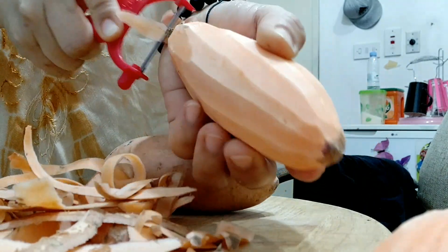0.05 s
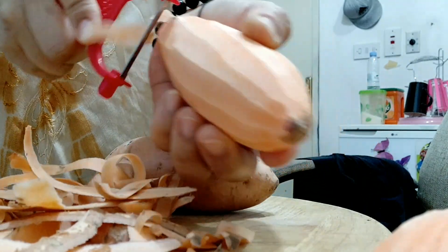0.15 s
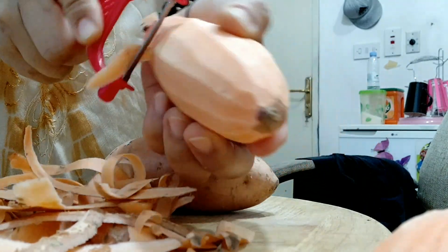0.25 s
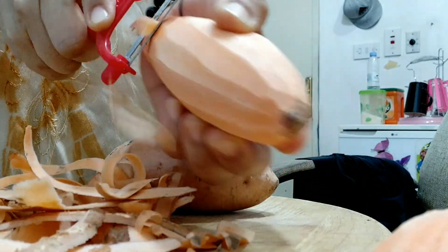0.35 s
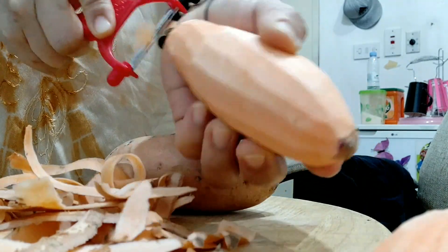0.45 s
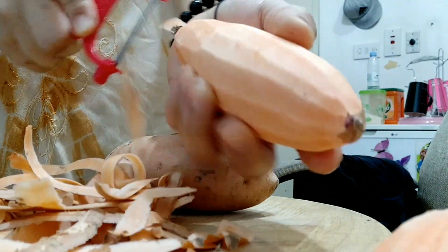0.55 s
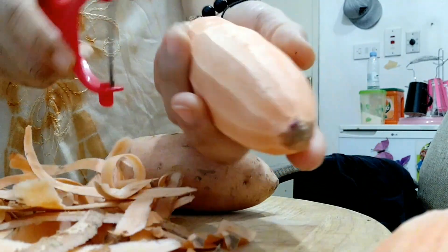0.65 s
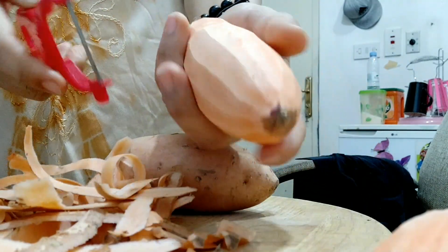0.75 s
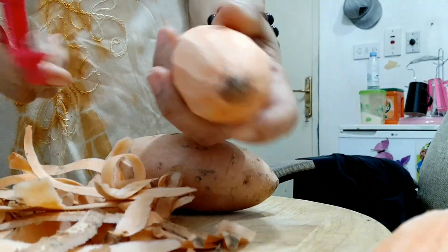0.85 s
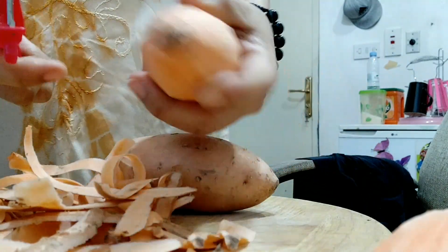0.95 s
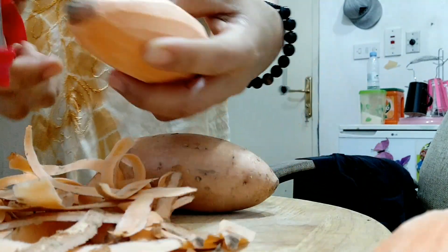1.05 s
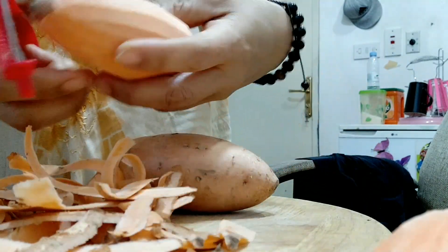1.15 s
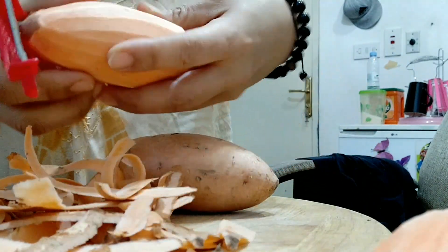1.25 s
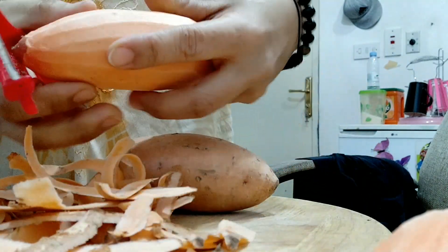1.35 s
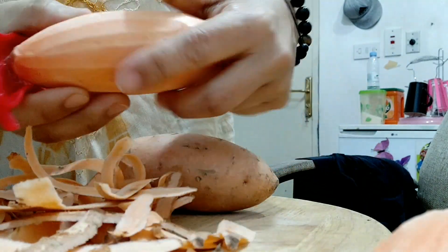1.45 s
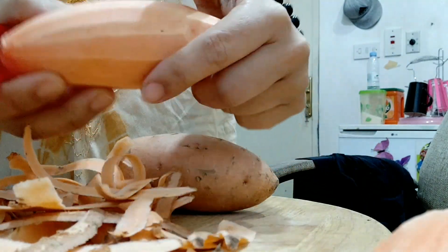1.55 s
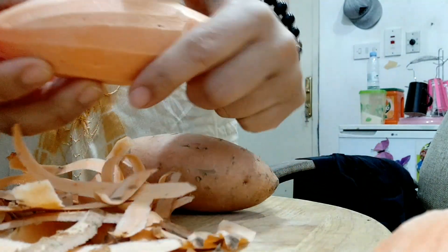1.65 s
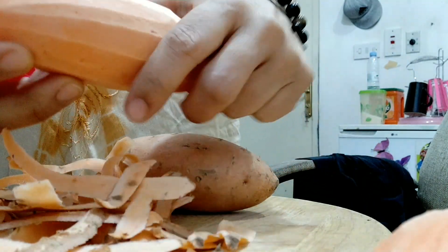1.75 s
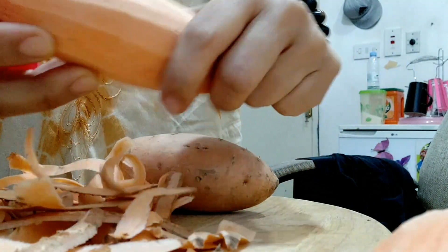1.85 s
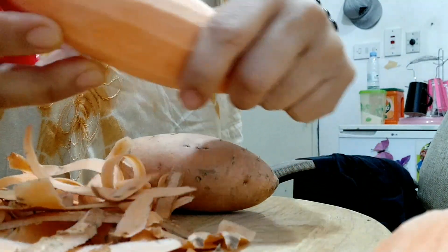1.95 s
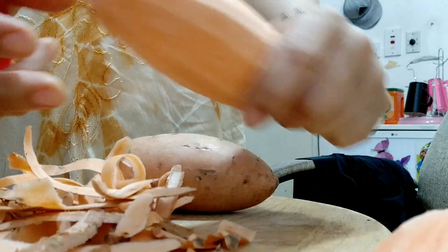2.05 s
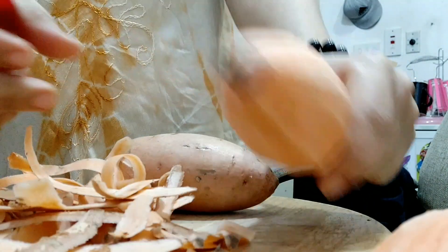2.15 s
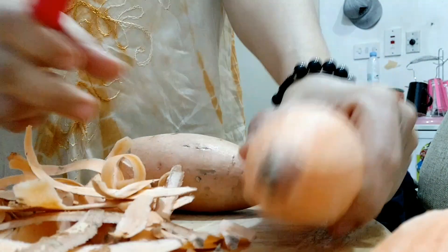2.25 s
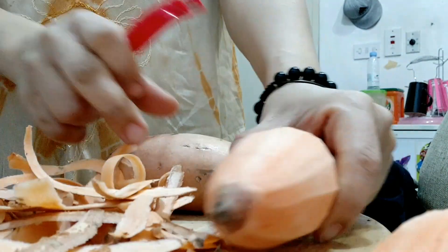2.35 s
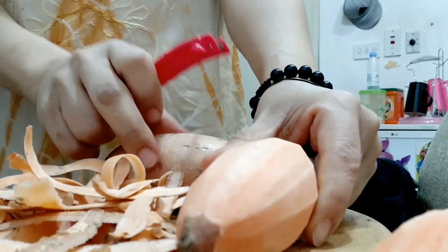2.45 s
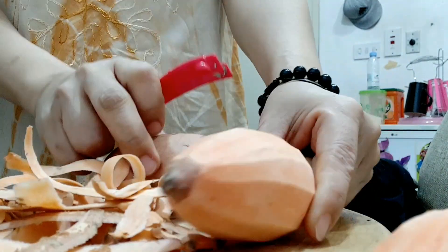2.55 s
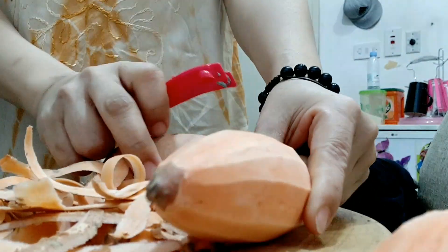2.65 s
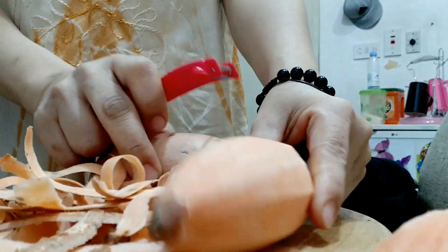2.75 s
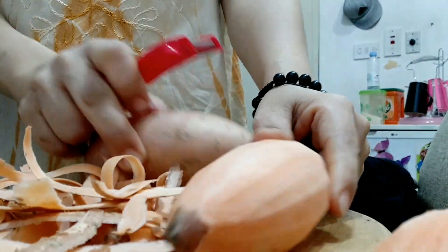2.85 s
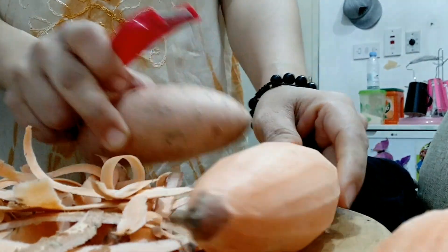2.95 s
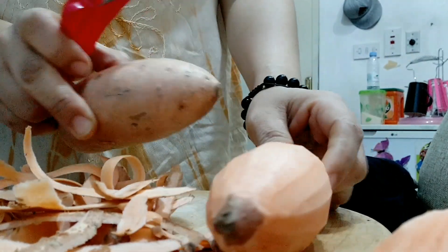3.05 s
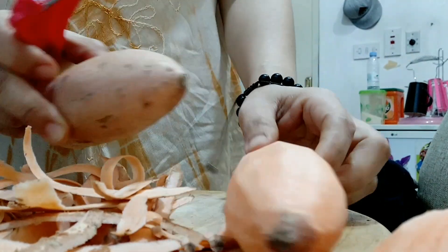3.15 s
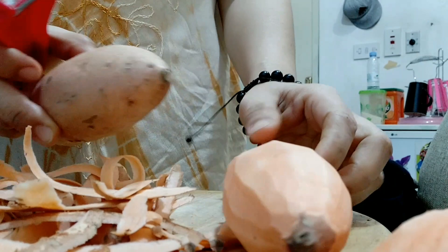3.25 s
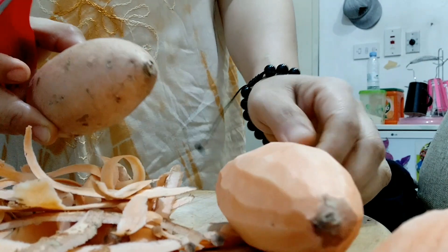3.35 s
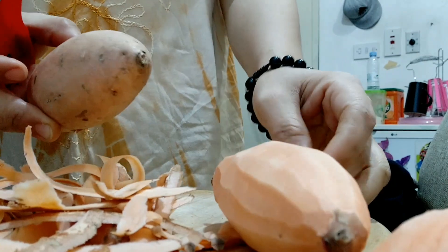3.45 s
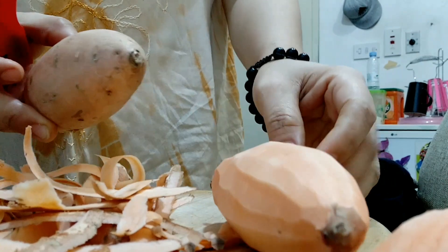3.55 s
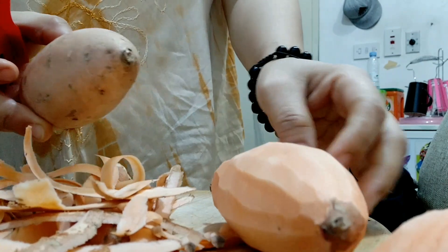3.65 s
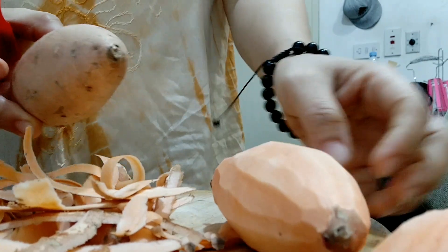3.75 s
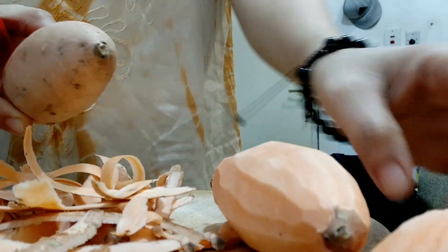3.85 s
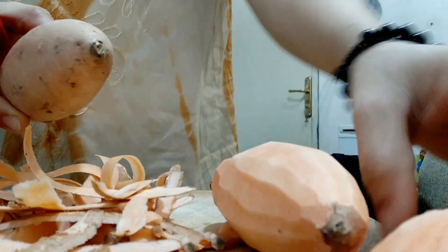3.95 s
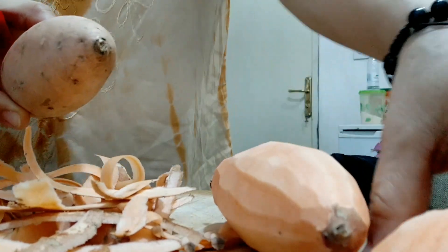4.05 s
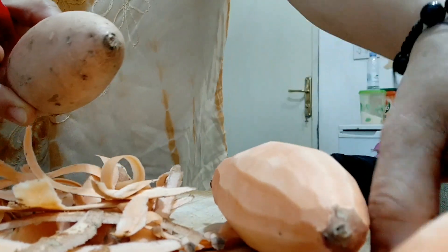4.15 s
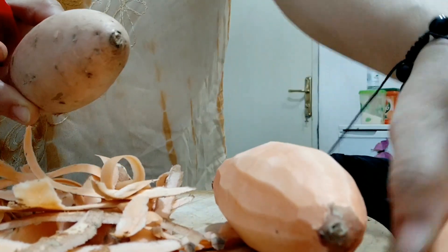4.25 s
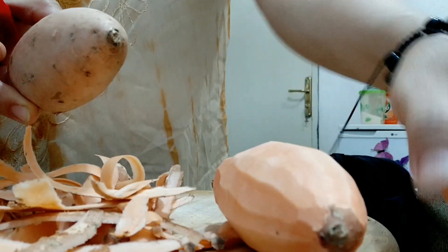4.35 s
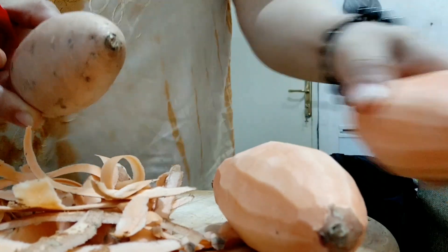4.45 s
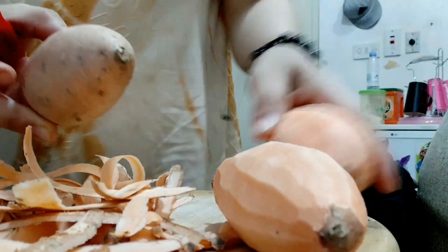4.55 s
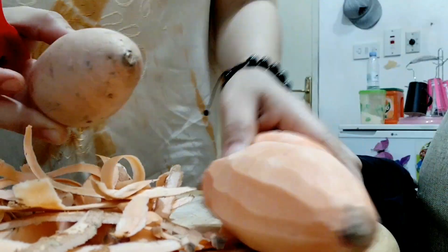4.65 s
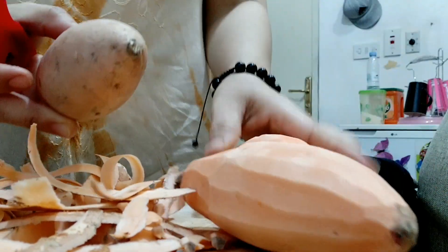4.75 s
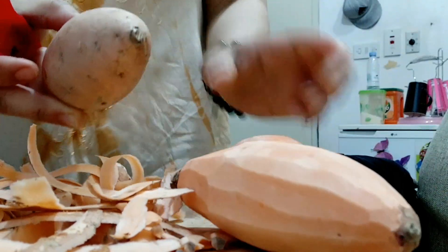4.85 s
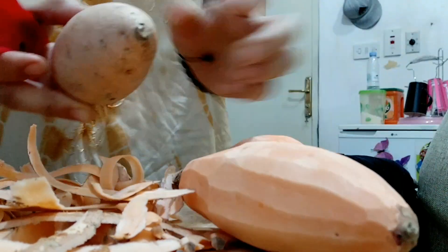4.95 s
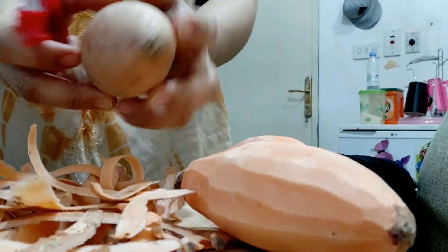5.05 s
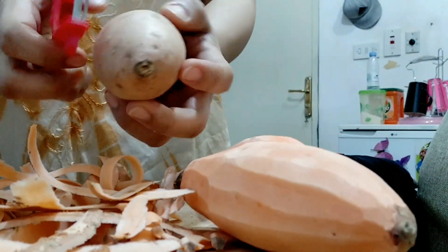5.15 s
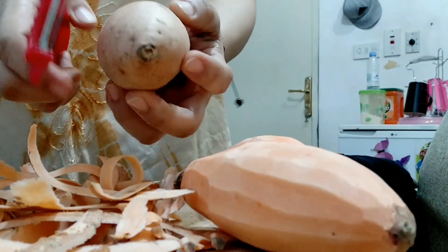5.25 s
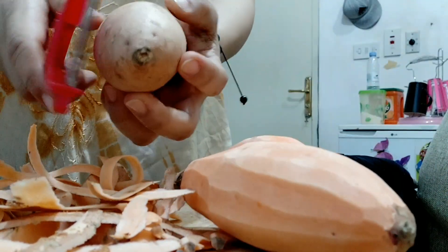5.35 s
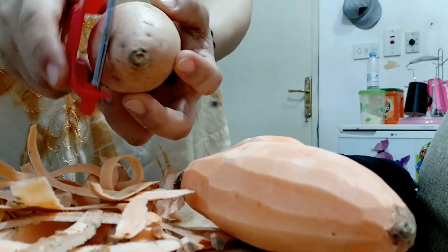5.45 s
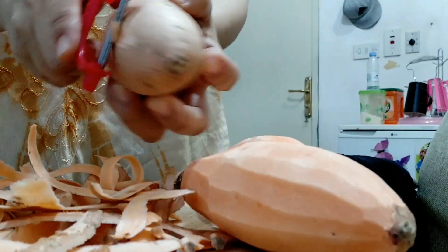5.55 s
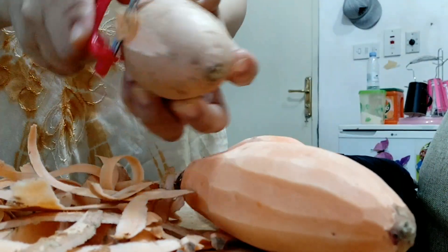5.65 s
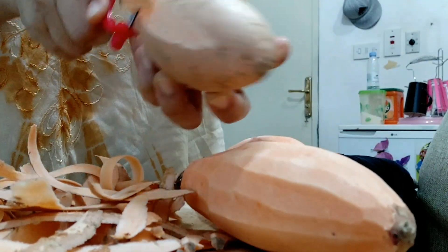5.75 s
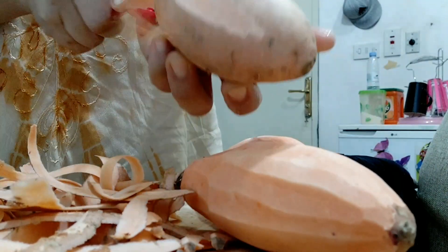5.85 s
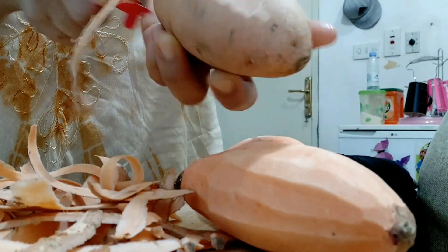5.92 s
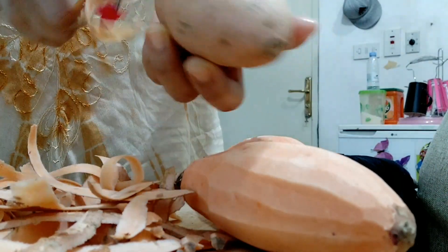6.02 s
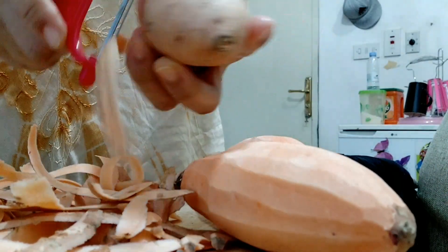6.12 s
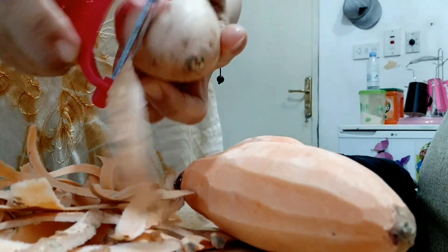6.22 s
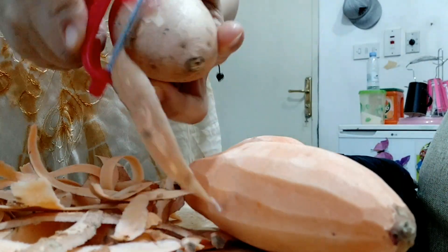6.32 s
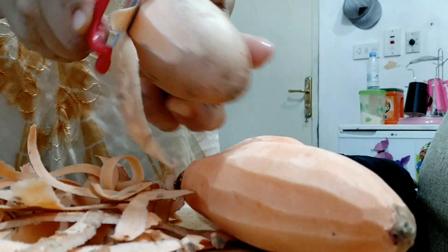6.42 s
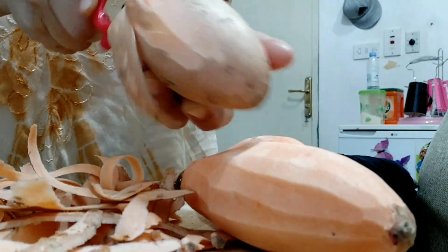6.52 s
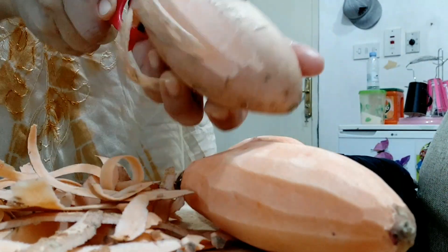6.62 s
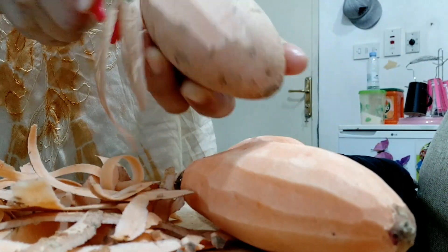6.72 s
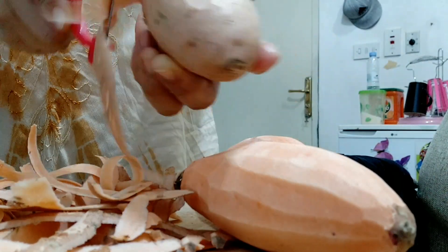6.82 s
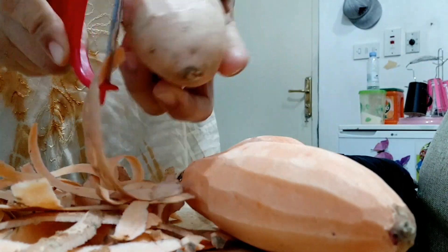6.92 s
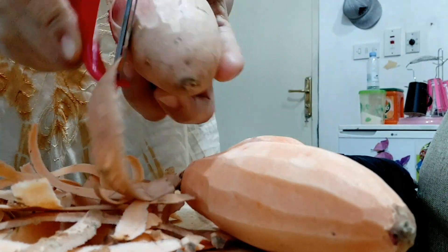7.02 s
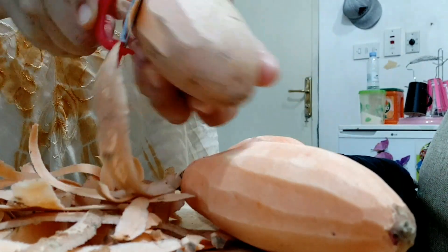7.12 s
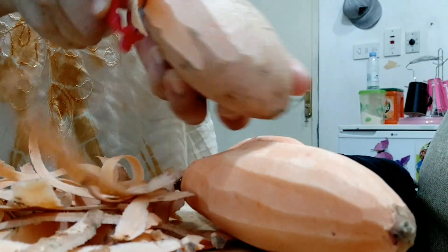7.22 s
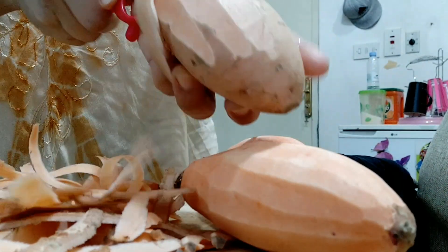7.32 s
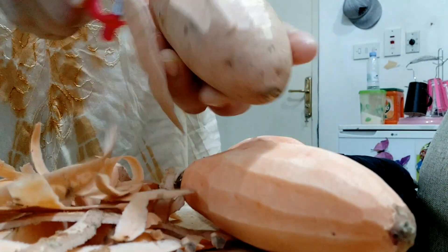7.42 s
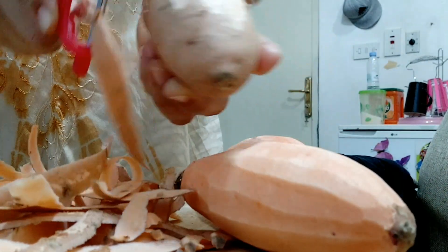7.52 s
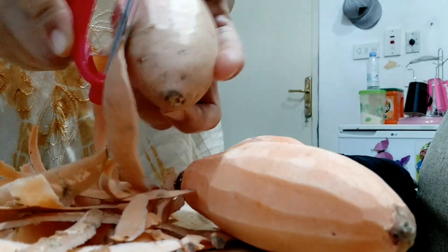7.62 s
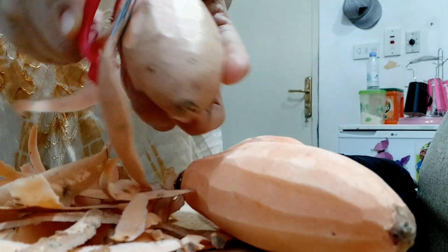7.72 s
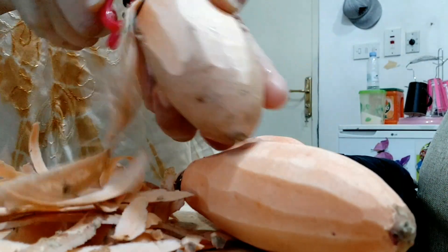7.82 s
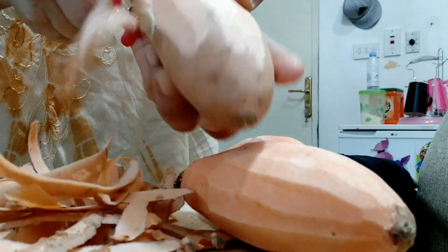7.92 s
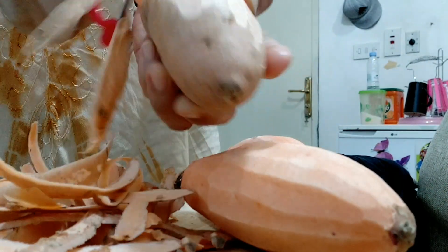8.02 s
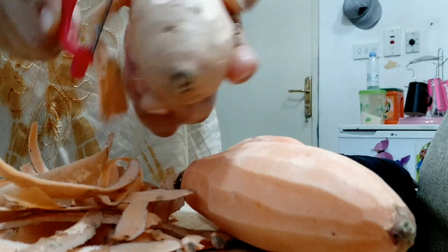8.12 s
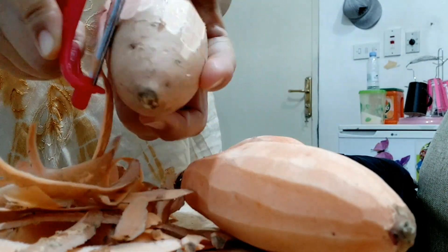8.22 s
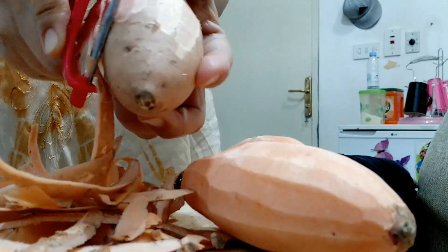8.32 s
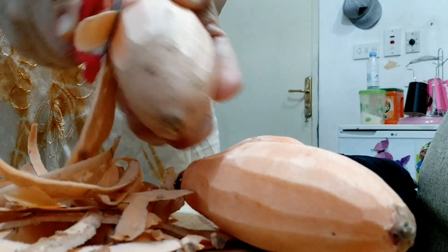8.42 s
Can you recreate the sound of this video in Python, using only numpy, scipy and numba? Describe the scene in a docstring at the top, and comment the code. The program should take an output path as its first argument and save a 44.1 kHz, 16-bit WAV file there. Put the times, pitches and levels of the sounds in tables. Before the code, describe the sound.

Two quick scrapes of a peeler with sharp metallic clacks open, followed by scattered ticks as the tool is handled. Firm sweet potatoes knock and bump on the board, one landing making a dish ring briefly, with quiet gaps and low shuffling between. Then longer, juicy, crackling strokes return, spaced apart. Very close phone pickup, short bright kitchen reflections, low wavering fan noise behind.

```python
"""Peeling a sweet potato, close up

A swivel peeler strips a raw sweet potato close to a phone's microphone in a small, hard-walled kitchen.
The loose blade clacks as bursts of noise, then rasps through the cells as dense, resonant crackle.
Between two runs of strokes the roots land on a wooden board as low sine cycles and knocks of noise, and
a metal dish rings faintly as beating sine modes. A fan hums throughout: coloured noise and motor tones.
"""
import sys
import numpy as np
from scipy import signal
from scipy.fft import rfft, irfft, next_fast_len
from scipy.io import wavfile
from scipy.ndimage import uniform_filter1d
from numba import njit

SR = 44100
rng = np.random.default_rng(int(sys.argv[2]) if len(sys.argv) > 2 else 0)


def to_wav(s):
    """Save 16-bit WAV."""
    ch = np.atleast_2d(s).T  # columns
    pcm = np.round(np.clip(ch, -1, 1) * 32767)  # PCM
    wavfile.write(sys.argv[1], SR, pcm.astype(np.int16))


N = 373968
T = np.arange(N) / SR

# blade strokes: (start [s], peel comes free [s], time to dig in [s], base level [dB],
#   change of level until the peel is free [dB], hollow body [dB], juicy fizz [dB], ribbon resonance [Hz],
#   bite at full depth [dB], last tug [dB], slide-off [dB], left minus right [dB], squeakiness [dB])
STROKE_TABLE = [(.045, .195, 0.062, -23.5, -2, -2.5, -8.5, 4300, 1, 2.5, -3.5, 2, -1.5),
                (.455, .612, 0.049, -22.5, 0, -5, -10, 4700, 0.5, 1, -13.5, 0, -1.5),
                (5.69, 5.975, 0.047, -17.5, -3, -4, -4.5, 4100, 0.5, -5.5, -16, -0.5, 4),
                (6.455, 6.768, 0.11, -17.5, -5, -6.5, -8, 4310, 5.5, -7, 1, 0.5, -3.5),
                (7.19, 7.475, 0.076, -18.5, -5, -6, -5, 4350, 1.5, -23, -1.5, -1, -12),
                (7.848, 8.07, 0.048, -18, -7, -5, -2.5, 4470, 1, -4, -1.5, -.5, -4.5),
                (8.405, 8.7, .1, -32, 8, 0, -7, 4330, 0, -6, -10, -1, -10)]
# roots and hands land on the board: (time [s], level [dB], pitch [Hz], time to the envelope's peak [s])
THUMP_TABLE = [(2.273, -29.5, 102, 0.013), (2.446, -17.5, 111, 0.011), (2.608, -6, 278, 0.0047),
               (2.994, -21, 97, .011), (3.425, -24, 93, 0.014), (4.238, -15, 93.5, .013),
               (4.357, -19, 85.4, 0.013), (4.786, -11, 114, 0.012), (4.84, -9.5, 133, 0.02),
               (4.877, -6.5, 86.6, 0.014), (4.93, -16.5, 90, 0.011)]
# colour of blade and skin on the root: (frequency [Hz], gain [dB])
RASP_SPECTRUM = [(60, -21), (150, -10.5), (350, 5), (600, 2.5), (800, 4.5), (1150, 6.5), (1750, 3.5),
                 (2300, 3.5), (2900, 1), (4300, 3.5), (5200, 3), (6500, 3.5), (8000, 5.5), (16000, 2)]
DISH_S = 2.625  # the dish is shaken [s]


def amp(db):
    """Decibels to gain."""
    return 10 ** (np.asarray(db) / 20)


def unit(x):
    """Scale to rms 1."""
    return x / np.sqrt(np.mean(x ** 2) + 1e-20)


def shape(x, gain):
    """Filter by a gain that is a function of frequency."""
    size = next_fast_len(x.shape[-1] + 2048)
    hz = np.maximum(np.arange(size // 2 + 1) * SR / size, 1)
    return irfft(rfft(x, size) * gain(hz), size)[..., :x.shape[-1]]


def colour(x, points):
    """Filter by a spectrum of (Hz, dB) points, joined along a logarithmic frequency axis."""
    hz, db = np.transpose(points)
    return shape(x, lambda f: amp(np.interp(np.log(f), np.log(hz), db)))


def band(x, lo_hz, hi_hz):
    """Causal band-pass."""
    sos = signal.butter(2, [lo_hz, min(hi_hz, .49 * SR)], "band", fs=SR, output="sos")
    return signal.sosfilt(sos, x)


def walk(rate):
    """Smooth chance with a spread near 1: random points, rate of them per second, joined by lines."""
    steps = rng.standard_normal(N // 8)
    return np.interp(T * rate, np.arange(len(steps)), steps) * np.sqrt(3 / 2)


def add(track, s, sound):
    """Mix a sound in at a time."""
    i = max(int(s * SR), 0)
    track[..., i:i + sound.shape[-1]] += sound[..., :max(N - i, 0)]


def ports(draw, like):
    """Three unrelated signals to a left and a right that share the first."""
    like = np.clip(like, 0, 1)
    return np.sqrt(like) * draw[0] + np.sqrt(1 - like) * draw[1:]


def registers(body, bite, fizz, spectrum):
    """Join the root's low body, the blade's bite and the juice's fizz under one spectrum."""
    low = lambda f: 1 / (1 + (f / 2600) ** 6)
    high = lambda f: 1 / (1 + (9500 / f) ** 12)
    return colour(bite + shape(body - bite, low) + shape(fizz - bite, high), spectrum)


@njit
def resonate(x, hz, width):
    """State-variable band-pass whose centre may move; gain 1 at the centre."""
    y, b, l = np.empty(len(x)), 0., 0.
    for i in range(len(x)):
        g, k = np.tan(np.pi * hz[i] / SR), width / hz[i]
        v = (b + g * (x[i] - l)) / (1 + g * (g + k))
        b, l, y[i] = 2 * v - b, l + 2 * g * v, k * v
    return y


def swells(table, span, like):
    """Soft swells of friction in a resonance; span is the ratio of its edge to its centre."""
    out, t = np.zeros((2, N)), T[:SR]
    span = max(span, 1.02)
    for s, db, length, hz in table:
        start = max(s - .5, 0)
        shake = unit(band(ports(rng.standard_normal((3, len(t))), like), hz / span, hz * span))
        swell = np.exp(-((start + t - s) / length) ** 2)
        add(out, start, amp(db) * shake * swell)
    return out


def crackle(per_s, spread_db, flutter_db, flutter_rate, like):
    """Cells burst as dense clicks of uneven size, in clumps as the blade sticks and slips."""
    sizes = amp(abs(spread_db) * np.minimum(rng.exponential(size=N), 3))
    bursts = (rng.random(N) < per_s / SR) * sizes
    # each burst is a fraction of a millisecond of spray
    spray = np.sqrt(signal.lfilter([1], [1, -.85], bursts ** 2))
    flutter = amp(flutter_db * walk(flutter_rate))
    return unit(ports(rng.standard_normal((3, N)), like) * spray * flutter)


def blade(x):
    """The steel blade's short ring, as a few parallel resonances."""
    # modes of the steel: (frequency [Hz], width [Hz], level [dB])
    modes = [(6170, 250, -0.5), (6460, 150, 4), (6680, 510, -11)]
    return shape(x, lambda f: sum(amp(db) / (1 + 1j * hz / width * (f / hz - hz / f))
                                  for hz, width, db in modes))


def peeling(body_db=-1, bite_db=-1, fizz_db=2, fade_s=0.016, ribbon_db=2.5, waver_db=5,
            ribbon_width_hz=340, blade_db=-5, root_hz=1800, root_width_hz=300, root_db=-1):
    """Each stroke swells as the blade digs in, changes level along the root, tugs the peel free, slides off."""
    dig_db = 14.5  # the rasp gains this much as the blade digs in
    tug_s, release_s, slide_s = 0.011, 0.031, 0.046  # last tug, release of the peel, blade sliding off
    bite_s, bite_spray = .03, 0.59  # at full depth the blade bites; extra dB of fizz per dB of bite
    dry_db, hollow_db = -5.5, -0.5  # change of fizz and of body from start to end of a stroke
    # the growing ribbon of peel sings lower (as a fraction) and softer, the steel louder
    ribbon_fall, ribbon_fade_db, blade_rise_db = 0.073, -9.5, 1.5

    drive, travel = np.zeros((3, 2, N)), np.zeros(N)
    ribbon_hz = np.full(N, float(STROKE_TABLE[0][7]))
    for start, free, dig, db, sag, body, fizz, hz, grip, tug, slide, pan, _ in STROKE_TABLE:
        along = np.clip((T - start) / (free - start), 0, 1)
        after = np.maximum(T - free, 0)
        contact = np.clip(1 + (T - start) / fade_s, 0, 1)
        depth = np.clip((T - start) / dig, 0, 1)
        release = np.maximum(np.exp(-after / release_s), amp(slide) * np.exp(-after / slide_s))
        last_tug = amp(tug) * np.exp(-((T - free) / tug_s) ** 2)
        force = contact * amp(db + dig_db * (depth - 1) + sag * along) * (release + last_tug)
        biting = grip * np.exp(-((T - start - dig) / bite_s) ** 2)
        cut = force * amp(biting + np.array([[pan], [-pan]]) / 2)
        hollowness = body + body_db + hollow_db * along
        juice = fizz + fizz_db + dry_db * along + bite_spray * biting
        drive += np.array([cut * amp(hollowness), cut * amp(bite_db), cut * amp(juice)])
        ribbon_hz = np.where(contact > 0, hz, ribbon_hz)
        travel = np.where(contact > 0, along, travel)
    body, bite, fizz = drive * crackle(per_s=6500, spread_db=1.0, flutter_db=0.5, flutter_rate=280, like=0.15)

    ribbon_hz = ribbon_hz * (1 + ribbon_fall * (.5 - travel))
    # the resonances wobble at random
    ribbon_hz = ribbon_hz * (1 + .03 * walk(30))
    hollow_hz = root_hz * (1 + .1 * walk(20))
    ribbon = np.array([resonate(side, ribbon_hz, float(ribbon_width_hz)) for side in bite])
    hollow = np.array([resonate(side, hollow_hz, float(root_width_hz)) for side in body])
    singing = amp(ribbon_db + ribbon_fade_db * travel + waver_db * walk(18)) * ribbon
    steel = blade(amp(blade_db + blade_rise_db * travel) * bite)
    return registers(body + amp(root_db) * hollow, bite + singing + steel, fizz, RASP_SPECTRUM)


def rubbing():
    """Short swells of fine crackle as fingers and peel shift on the root; they start fast and trail off."""
    # rubs: (time [s], level [dB], nominal length [s], body [dB], fizz [dB])
    rubs = [(1.049, -42.5, .012, 15, 3), (1.122, -35.5, 0.05, -7, -12), (2.04, -35.5, 0.018, 0, -14),
            (2.46, -43.5, 0.013, 13, -15), (2.507, -37, 0.033, 3.5, -19), (2.997, -57, 0.032, 21, -8),
            (4.293, -47.5, 0.071, 10, -14), (4.753, -42.5, 0.02, 12.5, 5.5), (4.846, -49, 0.1, 17, -9.5),
            (5.144, -57, 0.078, 4, -5), (5.336, -45, 0.081, 3.5, -10), (5.492, -46.5, .03, -2, -12),
            (5.6, -32.5, 0.033, 3, -2), (6.122, -40, .07, 4, -13), (7.01, -50, 0.13, 1, -10),
            (8.277, -48.5, 0.26, -1.5, -11)]
    drive = np.zeros((3, 1, N))
    for s, db, length, body, fizz in rubs:
        reach = np.where(T < s, .6, 1.2) * length
        levels = amp(db + np.array([body, 0, fizz]))[:, None, None]
        drive += levels * np.exp(-((T - s) / reach) ** 2)
    skin = crackle(per_s=6000, spread_db=2.2, flutter_db=2, flutter_rate=120, like=.3)
    return registers(*(drive * skin), RASP_SPECTRUM)


def shifting(x):
    """The rasp's colour varies at random in small patches of time and pitch."""
    _, _, cells = signal.stft(x, SR, nperseg=512)
    patches = rng.standard_normal(cells.shape[1:])
    for _ in range(2):
        patches = uniform_filter1d(uniform_filter1d(patches, size=4, axis=0), size=6, axis=1)
    return signal.istft(cells * amp(2.0 * unit(patches) - .5), SR)[1][:, :N]


def squeaks():
    """Wet flesh groans against the blade in mid-stroke and squeaks as the peel comes free."""
    squeak_db, squeak_s, squeak_hz = -15, 0.019, 727
    groan_db, groan_s, groan_hz, groan_at = -12.5, 0.068, 1710, .45  # groan_at: fraction of the cut
    rows = []
    for start, free, _, db, *_, squeaky in STROKE_TABLE:
        rows.append((start + groan_at * (free - start), db + squeaky + groan_db, groan_s, groan_hz))
        rows.append((free, db + squeaky + squeak_db, squeak_s, squeak_hz))
    return swells(rows, span=1.16, like=0.15)


def clacks(body_db=-1, bite_db=1, fizz_db=3, like=0.44, rise_s=0.00069, halo_db=-22, halo_s=0.0076,
           ring_db=-3):
    """Each clack is a burst of noise, rising fast and decaying in milliseconds, within a faint halo."""
    # blade clacks in its pivots or bites in:
    # (time [s], level [dB], body [dB], fizz [dB], decay of the burst [s])
    hits = [(0.0337, -2, -13.5, -8, 0.0022), (.404, -37, 6, -4, .0024), (.4464, -13.5, -19, -19.5, 0.003),
            (.451, -8.5, -10.5, -9.5, .003), (0.603, -5.5, -19, -11.5, 0.0024),
            (0.621, -11.5, -4.5, -11.5, 0.0037), (0.7746, -35.5, 8, -9, 0.0047),
            (1.0494, -16.5, -7.5, -10.5, 0.0056), (1.0909, -13.5, -6.5, -8, 0.0055),
            (1.12, -7.5, -7, -12, .0016), (1.1452, -20.5, -2, -11, 0.0023),
            (1.2423, -18, -3, -12.5, 0.0053), (1.276, -30, 2, -27, 0.0049), (1.3728, -18, -2.5, -4, .004),
            (1.396, -18.5, -4.5, -11, 0.0063), (1.484, -24, 1.5, -7.5, 0.0053),
            (1.6188, -27, 5.5, -14, 0.0029), (2.0357, -16.5, -20, -14.5, 0.0057),
            (2.0702, -21, 1, -11, 0.0063), (2.2812, -25, 8, -9.5, 0.0024), (2.8059, -23.5, 3.5, -17, .009),
            (4.7402, -17, -15, -3.5, 0.0016), (5.2977, -26, 3.5, -26, 0.0057),
            (5.3406, -17.5, -8, -15, 0.0082), (5.564, -9.5, -2.5, -3.5, 0.0014),
            (5.5824, -7, -6.5, -4, 0.0043), (5.606, -7.5, -22, -6, 0.0025), (6.1684, -6.5, -4, -12, 0.0015),
            (6.3005, -10.5, -6, -4.5, 0.0035), (6.4194, -5.5, -8.5, -6, 0.0027),
            (6.9701, -22, 2.5, -3.5, 0.0027), (7.1688, -9, 0, -3, 0.0042), (7.8189, -17, -.5, -18, 0.0094),
            (7.8661, -15.5, 2.5, -6, .003), (8.3905, -1, -16.5, -13.5, 0.0015)]
    # colour of a clack: (frequency [Hz], gain [dB])
    spectrum = [(70, 12.5), (200, 8.5), (500, 7), (1000, 3.5), (1600, 4.5), (3000, -10), (4500, -1),
                (6600, -1), (8000, 0.5), (16000, 0)]
    lead = .025  # room for the halo ahead of the burst [s]
    drive, t = np.zeros((3, 2, N)), T[:SR // 10] - lead
    after = np.maximum(t, 0)
    for s, db, body, fizz, length in hits:
        burst = (1 - np.exp(-after / rise_s)) * np.exp(-after / length)
        halo = amp(halo_db) * np.exp(-abs(t) / halo_s)
        noise = ports(rng.standard_normal((3, len(t))), like) * (burst + halo)
        levels = amp(db + np.array([body + body_db, bite_db, fizz + fizz_db]))
        add(drive, s - lead, levels[:, None, None] * noise)
    body, bite, fizz = drive
    return registers(body, bite + amp(ring_db) * blade(bite), fizz, spectrum)


def thumps():
    """Heavy soft roots push the board into a few low cycles, which reach the phone through the table."""
    out, t = np.zeros(N), T[:SR // 2]
    for s, db, hz, rise in THUMP_TABLE:
        push = (t / rise * np.exp(1 - t / rise)) ** 2
        add(out, s, amp(db) * push * np.sin(2 * np.pi * hz * t))
    return out


def board(contact_s=0.00062, span=1.54, ring_s=0.058, clatter_hz=900, clatter_span=2.4, clatter_s=0.041,
          settle_s=0.0026):
    """Firmer contacts give a short woody knock; the board rings on and clatters as it settles."""
    # harder knocks: (time [s], level [dB], decay [s], centre [Hz], after-ring [dB], clatter [dB])
    knocks = [(2.037, -33, 0.014, 880, -20, -19), (2.444, -23.5, 0.007, 440, -22, -12),
              (2.612, -15.5, 0.0061, 282, -9, -16.5), (4.232, -21, 0.0096, 327, -24, -13.5),
              (4.613, -21.5, 0.0044, 1280, -46, -25.5), (4.791, -35.5, 0.051, 340, -16, -14.5)]
    out, t = np.zeros((2, N)), T[:SR // 2]
    span, clatter_span = max(span, 1.1), max(clatter_span, 1.1)

    def wood(hz, edge):
        """Noise in a band around the wood's pitch."""
        return unit(band(ports(rng.standard_normal((3, len(t))), like=0.68), hz / edge, hz * edge))

    settling = 1 - np.exp(-t / settle_s)
    for s, db, length, hz, ring, clatter in knocks:
        strike = np.exp(-t / length) * (1 - np.exp(-t / contact_s))
        knock = strike + amp(ring) * settling * np.exp(-t / ring_s)
        rattle = amp(clatter) * settling * np.exp(-t / clatter_s)
        add(out, s, amp(db) * (knock * wood(hz, span) + rattle * wood(clatter_hz, clatter_span)))
    return out


def rumbles():
    """Low shaking from each stroke's push and each thump, with handling, sleeve rustle and rolling roots."""
    # low swells of handling, sleeve rustle and rolling roots:
    # (time [s], level [dB], length [s], centre [Hz])
    low_swells = [(0.198, -38.5, .09, 90), (1.121, -37.5, 0.088, 160), (1.73, -42, 0.088, 100),
                  (2.08, -35.5, 0.027, 162), (2.495, -35, 0.053, 253), (2.679, -34.5, 0.13, 140),
                  (2.856, -39, 0.026, 525), (3.87, -42.5, 0.051, 266), (4.304, -39.5, 0.059, 326),
                  (4.86, -25.5, 0.072, 126), (5.339, -39.5, 0.038, 370), (5.9, -32.5, 0.18, 75),
                  (6.187, -30, 0.031, 100), (7.029, -39, .077, 128)]
    # each stroke shakes the hands; push_follow is dB of shaking per dB of rasp
    push_db, push_follow, push_s, push_hz = -28, 0.49, .15, 116
    # the board shudders after each thump
    shudder_db, shudder_s, shudder_lag_s, shudder_hz = -33, 0.057, .03, 193
    pushes = [(free - push_s / 2, push_follow * db + push_db, push_s, push_hz)
              for _, free, _, db, *_ in STROKE_TABLE]
    shudders = [(s + shudder_lag_s, db + shudder_db, shudder_s, shudder_hz) for s, db, *_ in THUMP_TABLE]
    return swells(pushes + shudders + low_swells, span=1.53, like=0.94)


def dish(level_db=-19, rise_s=0.02, split_hz=8, twin_db=-7):
    """The heaviest landing shakes a metal dish; its modes beat in pairs, with their own phase at each port."""
    # the dish's modes: (frequency [Hz], relative level [dB], time to fall 60 dB [s])
    modes = [(189, -11, .35), (241.6, 2.5, 0.33), (331, -9, 0.59), (557, -1, 0.16), (1554, -11.5, 0.29),
             (2400, -21.5, 0.65), (2896, -17, 0.63), (3610, -15, 0.58), (3920, -29.5, 0.5),
             (4550, -16, 0.22), (5140, -20, 0.57), (5626, -33, .4), (6100, -26, 0.49), (6700, -32, .3),
             (7230, -27, 0.4), (7600, -14, 0.36), (8520, -4, 0.39)]
    out, t = np.zeros((2, N)), T[:SR]
    for hz, db, t60 in modes:
        # low modes are nearly in phase at the two ports
        phase = rng.uniform(-1, 1, (2, 2, 1)) * min(hz / 2000, 1)
        twin_hz = hz + split_hz * rng.uniform(.5, 2)
        twin = amp(twin_db) * np.sin(2 * np.pi * twin_hz * t + phase[1])
        ring = np.sin(2 * np.pi * hz * t + phase[0]) + twin
        fade = np.exp(-np.log(1000) * t / t60) * (1 - np.exp(-t / rise_s))
        add(out, DISH_S, amp(level_db + db) * fade * ring)
    return out


def dish_rattle(db=-34, lo_hz=2340, hi_hz=5500, length_s=0.066, lag_s=0.0048):
    """The shaken dish buzzes briefly on its foot, as a decaying band of noise."""
    out, t = np.zeros((2, N)), T[:SR // 2]
    buzz = unit(band(ports(rng.standard_normal((3, len(t))), like=0.23), lo_hz, hi_hz))
    add(out, DISH_S + lag_s, amp(db) * buzz * np.exp(-t / length_s))
    return out


def diffuse(size, alike_hz=330):
    """Room noise at two ports: alike in the bass, unrelated in the treble."""
    mid, side = rng.standard_normal((2, size))
    like = lambda f: 1 / (1 + (f / alike_hz) ** 2)
    shared = shape(mid, lambda f: np.sqrt(1 + like(f)))
    opposed = shape(side, lambda f: np.sqrt(1 - like(f)))
    return shared + np.array([[1], [-1]]) * opposed


def fan(air_db=-38.5, waver_db=2, drift=0.13):
    """Rushing air with a narrow whine, over wavering motor tones; the whole swells and sinks."""
    # colour of the rushing air: (frequency [Hz], gain [dB])
    spectrum = [(25, -29.5), (50, -3), (68, -17), (100, -12), (140, -10.5), (260, -22.5), (620, -21),
                (800, -27), (1300, -29.5), (1470, -13), (1750, -35.5), (2600, -37), (4000, -47),
                (16000, -57.5)]
    # motor tones: (frequency [Hz], mean level [dB])
    tones = [(71.7, -38.5), (193.8, -51), (344, -59), (608, -61), (640, -61), (1459, -58)]
    # the background swells and sinks: (time [s], level [dB])
    swell = [(0, -0.5), (.85, -7.5), (1.2, 0), (2.35, -4.5), (2.93, -2.5), (3.15, -3.5), (3.45, 1),
             (3.9, -0.5), (4.5, -5.5), (5.05, -1.5), (6.1, 2), (7.0, 1), (7.55, 2.5), (7.72, -6), (8.2, -1)]
    air = unit(colour(diffuse(N), spectrum)) * amp(air_db + .6 * walk(6))
    for hz, db in tones:
        offset = rng.uniform(-1, 1, (2, 1)) * min(hz / 600, 2)
        phase = 2 * np.pi * hz * T + drift * walk(6) + offset
        air += np.sqrt(2) * amp(db + waver_db * walk(6.2)) * np.sin(phase)
    return air * amp(np.interp(T, *np.transpose(swell)))


def kitchen(x, wet_db, t60_low=0.4, t60_mid=0.19, t60_top=0.15, early_db=-9, early_s=0.0072):
    """Quick reflections from board and hands, then the ring of the bare walls."""
    t = T[:SR * 3 // 4]
    noise = unit(diffuse(len(t)))
    low = shape(noise, lambda f: 1 / (1 + (f / 900) ** 2))
    top = shape(noise, lambda f: 1 / (1 + (9000 / f) ** 6))
    parts = [(low, t60_low), (noise - low - top, t60_mid), (top, t60_top)]
    tail = sum(part * amp(-60 * t / t60) for part, t60 in parts)
    early = diffuse(len(t)) * np.exp(-t / early_s) * (t > .001)
    echo = (amp(wet_db) * unit(tail * (t > .005)) + amp(early_db) * unit(early)) / np.sqrt(len(t))
    return x + signal.fftconvolve(x, echo, axes=1)[:, :N]


def scene():
    """Peeler, board and dish in the room, over the fan."""
    rasp = shifting(peeling() + rubbing()) + squeaks()
    peeler = kitchen(rasp, wet_db=-7.5) + kitchen(clacks(), wet_db=-5.0)
    knocking = kitchen(board() + dish_rattle(), wet_db=-23.5, early_db=-0.5)
    table = knocking + rumbles() + thumps() + dish()
    return peeler + table + fan()


def record(dry):
    """The phone's microphone port notches the treble; deep bass and the very top are cut."""
    # the port swallows a band in the treble: (frequency [Hz], gain [dB])
    port = [(7100, 0.5), (7800, -7), (8500, -22), (9300, -14), (10500, -3), (11600, -1), (12600, 6.5),
            (14000, 10), (15700, 1.5)]
    low_cut_hz, top_hz = 71.5, 16000
    heard = shape(colour(dry, port), lambda f: 1 / np.sqrt(1 + (low_cut_hz / f) ** 8))
    top_cut = signal.ellip(10, .2, 70, top_hz, fs=SR, output="sos")
    return signal.sosfilt(top_cut, np.clip(heard, -1, 1))


dry = scene()
out = record(dry)
to_wav(out)
```